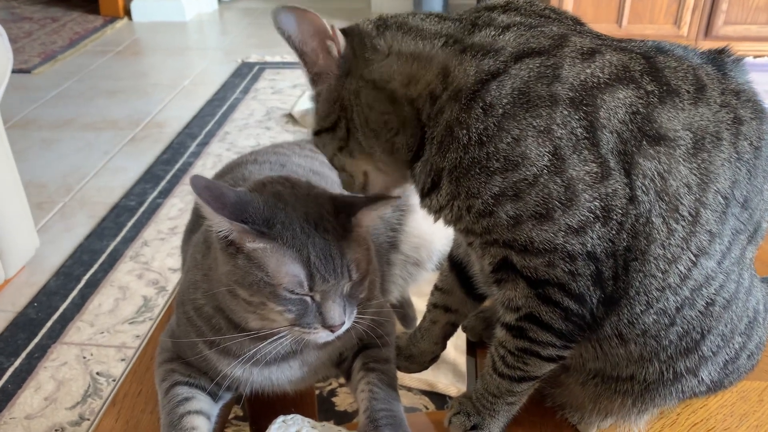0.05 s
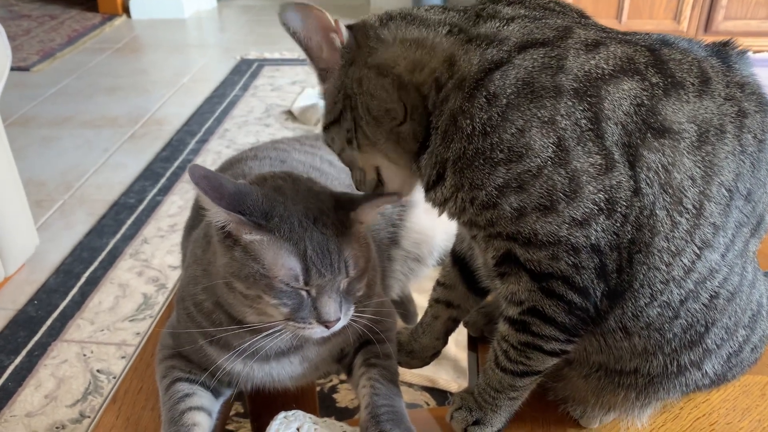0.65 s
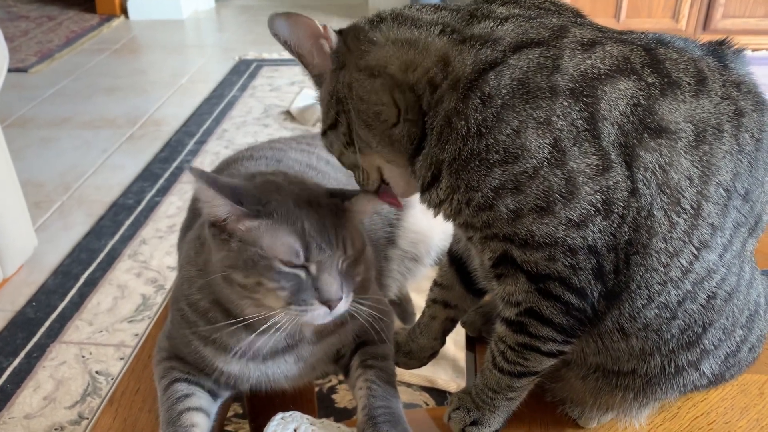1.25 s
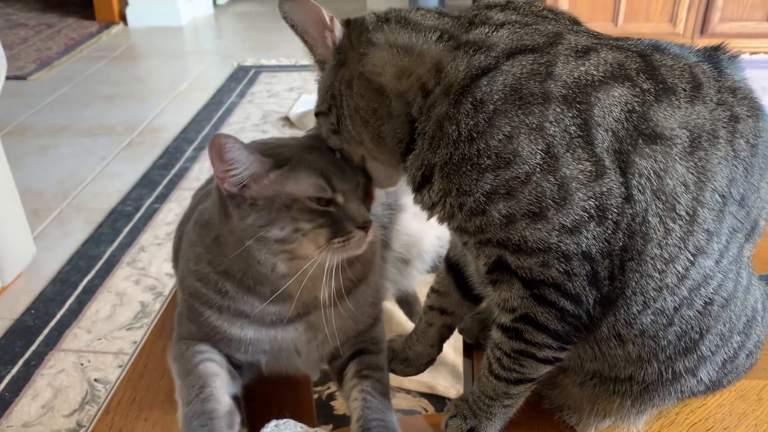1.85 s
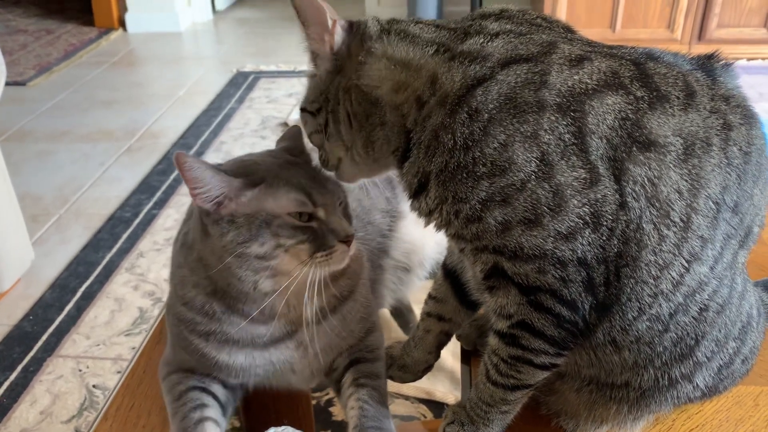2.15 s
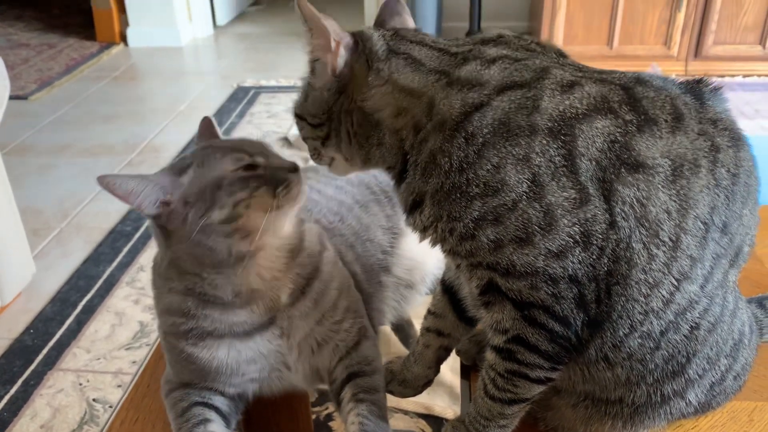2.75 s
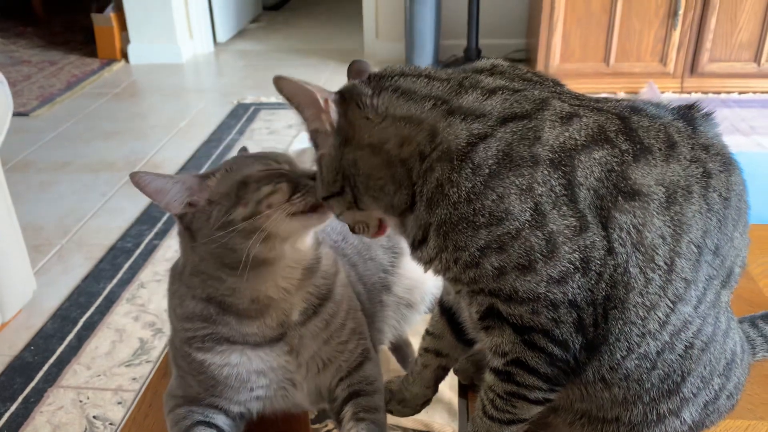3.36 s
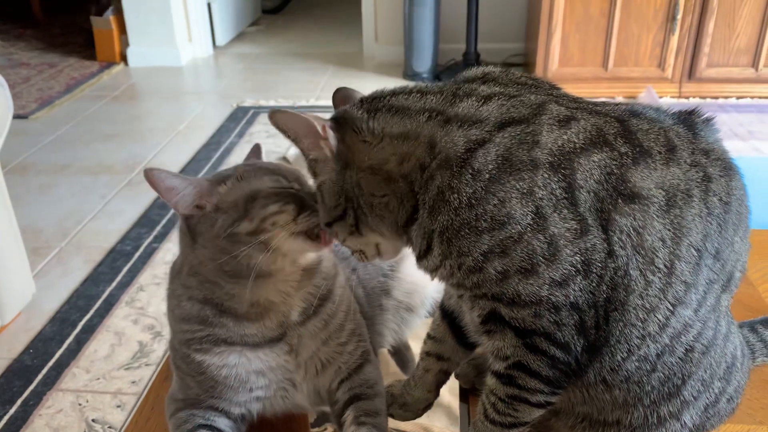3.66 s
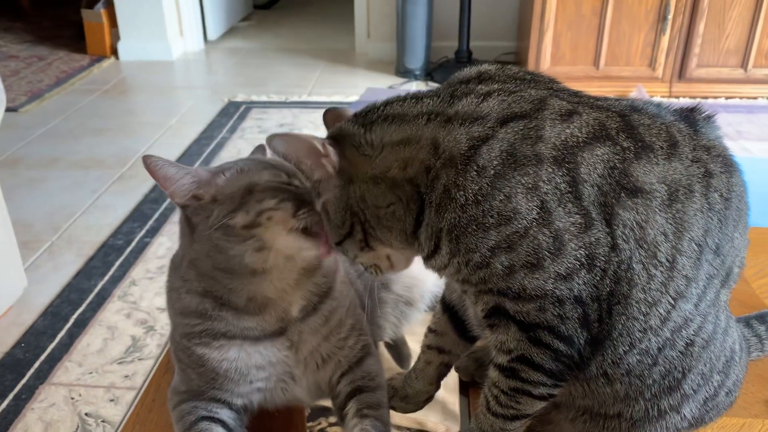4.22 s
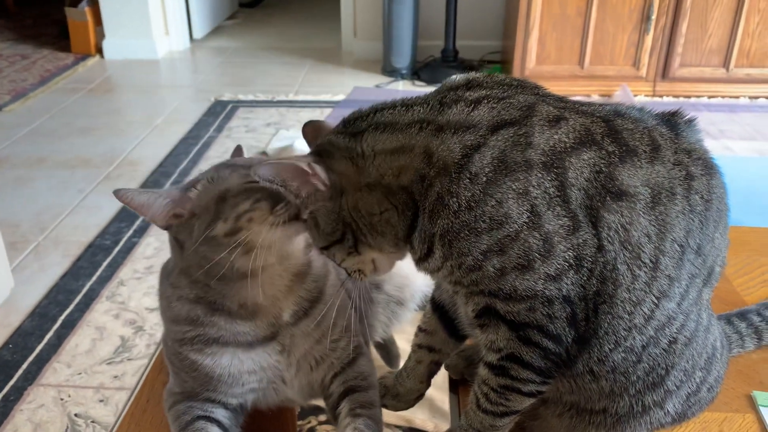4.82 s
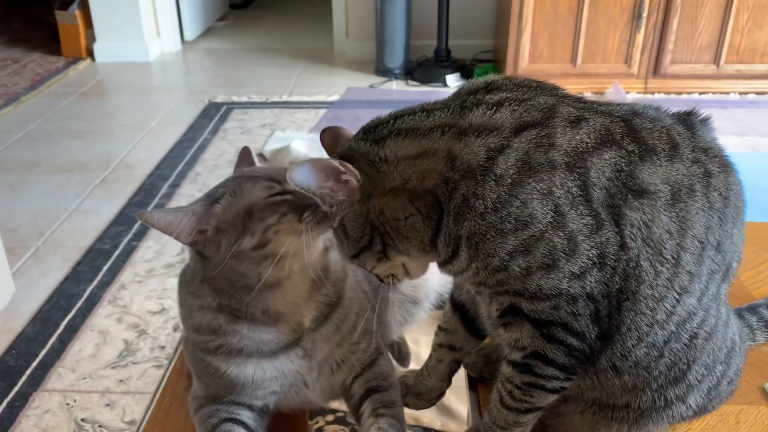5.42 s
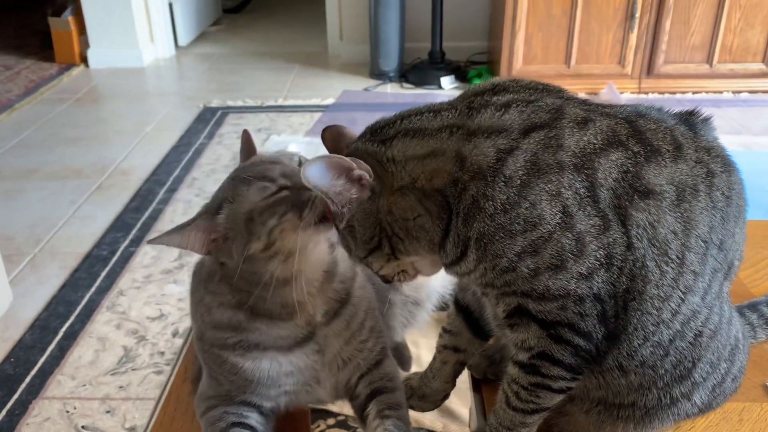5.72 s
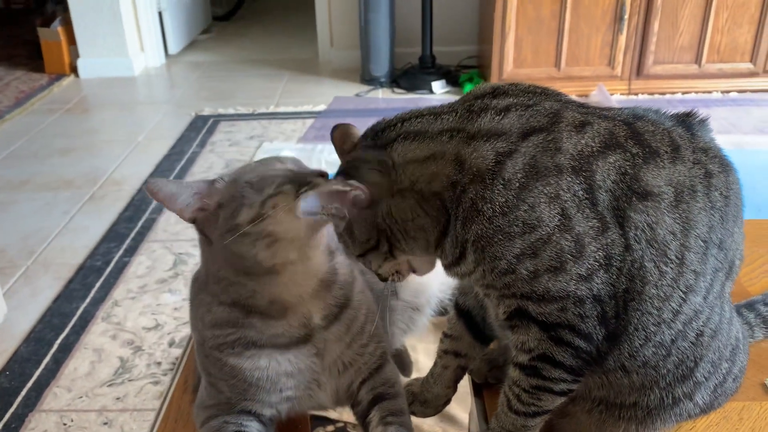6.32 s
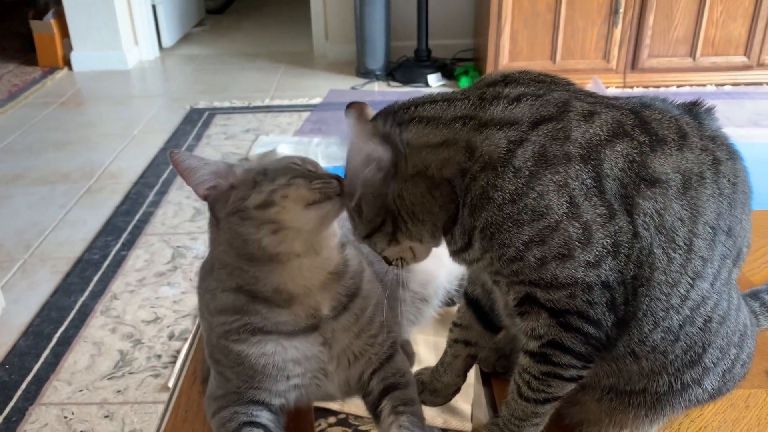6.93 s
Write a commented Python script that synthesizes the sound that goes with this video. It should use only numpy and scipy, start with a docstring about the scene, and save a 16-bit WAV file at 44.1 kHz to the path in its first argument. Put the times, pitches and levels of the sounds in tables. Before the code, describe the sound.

Muffled traffic is heard through the walls of a kitchen throughout, with a low room rumble and faint microphone hiss. A low engine drone is the loudest sound: it rises at about 0.4 seconds, holds until roughly 1.6, then fades away by 3. Tyre noise swells and ebbs, coming up around 3 to 4 seconds, easing off, and returning near 7.

Close by and much quieter, a cat licks another cat. Tiny, high, wet tongue ticks and a faint rasp of fur come in bouts around 1, 3, 4.4 and 6 seconds. The sharpest ticks fall between 3.9 and 4.4 seconds. A saliva bubble pops at 4.4, and a quick cluster follows near 5.5. The lips smack faintly at 1.7 and more clearly at 6.1. Very soft swishes recur a little less than a second apart. Cats and traffic both sit slightly right of centre.

```python
"""A cat grooms another on a kitchen floor: saliva threads tick, bubbles pop, tongue barbs catch hairs,
lips smack; soft swishes recur at an even pace. Floor and cabinets add a short tail.
Traffic outside, louder but dulled by the walls: an engine drones and fades, tyres swell and ebb,
the room booms on its low modes. A close pair of microphone ports adds faint hiss."""
import sys
import numpy as np
from scipy import signal
from scipy.fft import rfft, irfft, next_fast_len
from scipy.io import wavfile
from scipy.ndimage import uniform_filter1d, map_coordinates

SR = 44100
rng = np.random.default_rng(int(sys.argv[2]) if len(sys.argv) > 2 else 0)


def generate_wav(sig):
    """Save sig (samples, or channels by samples) to the path in sys.argv[1] as 16-bit PCM at SR."""
    pcm = np.round(np.clip(np.atleast_2d(sig).T, -1, 1) * 32767).astype(np.int16)
    wavfile.write(sys.argv[1], SR, pcm)


N = 316638

# noise spectra: f/Hz, relative level/dB
ROOM_BOOM_SPECTRUM = [(20, -26.5), (32, -10.5), (50, -4.5), (66, -3), (86, 2.5), (100, -5), (112, -5.5),
                      (140, -9.5), (200, -12), (500, -120)]
VEHICLE_BODY_SPECTRUM = [(20, -58), (90, -29), (140, -2.5), (170, 5), (205, 8.5), (250, 11.5), (290, 8.5),
                         (330, 4.5), (380, -4.5), (600, -40.5), (1500, -120)]
TYRE_ROAR_SPECTRUM = [(20, -46.5), (200, -31.5), (380, -2.5), (470, 3), (580, -3), (830, -3), (1150, -3.5),
                      (1300, -2.5), (1430, -1), (1550, -6), (1750, -13.5), (2100, -28.5), (3200, -47.5),
                      (9000, -120)]
TYRE_FIZZ_SPECTRUM = [(900, -29), (1800, 1.5), (2300, 3.5), (2700, -5), (3100, -16), (4500, -21),
                      (7000, -33), (13000, -94)]
VEHICLE_HISS_SPECTRUM = [(1500, -30.5), (2700, 10), (3300, 3.5), (3900, -0.5), (4500, 10), (5000, 6),
                         (5700, -8), (6900, -2.5), (8000, -23.5), (14000, -71.5)]
MIC_SPECTRUM = [(100, 1.5), (2500, 4), (4200, 5.5), (5300, 0), (7000, 4), (8500, -11.5), (10000, 3.5),
                (11500, 4), (12400, -1), (13300, -10), (15500, -8)]
SWISH_SPECTRUM = [(1200, -20), (2700, 9.5), (4000, -4.5), (7000, -3.5), (9000, -3.5), (11000, 1),
                  (13000, -20), (15500, -12)]
DULL_SWISH_SPECTRUM = [(2000, -24.5), (3400, 4), (4500, -3.5), (5700, 0.5), (7500, -15.5)]
# left-right coherence: f/Hz, coherence
ROOM_COHERENCE = [(30, 1), (90, 0.87), (160, 0.71), (250, 0.89), (500, 0.46), (1400, 0.28), (2300, 0.068),
                  (5000, 0.099)]
MIC_COHERENCE = [(1000, 0.067), (10000, 0.16)]
SWISH_COHERENCE = [(2500, 0.051), (10000, 0.27)]
DULL_SWISH_COHERENCE = [(4000, .4)]
# traffic swells: peak t/s, half length/s, body level/dB, roar level/dB
TRAFFIC_SWELLS = [(0, 0.43, -51, -55), (0.647, 0.39, -60.5, -56), (1.551, 0.85, -57, -59),
                  (3.23, 0.11, -57.5, -62.5), (3.247, 0.57, -56, -55.5), (3.48, 0.044, -66, -58.5),
                  (3.956, 0.43, -58.5, -61.5), (4.292, 0.15, -69, -58.5), (4.898, 0.42, -64.5, -64.5),
                  (6.25, 0.071, -77, -62), (6.46, 0.2, -68, -60.5), (7.036, 0.4, -58, -59.5)]
# constant distant traffic: body level/dB, roar level/dB
TRAFFIC_FLOOR_DB = (-74, -67)
# envelopes of tyre fizz, vehicle hiss, near engine fundamental: t/s, level/dB
FIZZ_ENVELOPE = [(0, -66.5), (.45, -67.5), (.9, -72.5), (1.5, -78), (2.45, -79.5), (2.8, -73),
                 (3.35, -71.5), (3.6, -72), (3.9, -84.5), (4.25, -71.5), (4.6, -84), (5.9, -86.5),
                 (6.35, -81.5), (7.18, -81)]
HISS_ENVELOPE = [(0, -75), (.33, -75.5), (.5, -73), (.7, -75.5), (.98, -84.5), (1.9, -87), (2.5, -95),
                 (3.8, -94.5), (4.25, -85), (4.6, -103)]
DRONE_ENVELOPE = [(0, -47.5), (.25, -49.5), (.41, -33.5), (.5, -33), (.7, -33), (.85, -36), (1.2, -35),
                  (1.3, -39), (1.6, -37.2), (1.8, -44.5), (1.9, -41.5), (2.08, -49), (2.18, -43.5),
                  (2.35, -47), (2.5, -53), (2.85, -53.5), (3.3, -72)]
# near engine overtones: multiple of firing rate, level/dB, peak t/s, half length/s
ENGINE_OVERTONES = [(2, -52.5, 1.06, 0.81), (3, -63.5, 1.03, 0.84), (4, -59, 0.67, 0.15),
                    (5, -55, .72, 0.16)]
# low hums of traffic and room: peak t/s, half length/s, f/Hz, level/dB
TRAFFIC_HUMS = [(0.055, 0.2, 162.7, -56.5), (.05, 0.14, 324.7, -59.5), (0.301, 0.24, 261.5, -58.5),
                (1.599, 0.5, 324, -60), (2.298, 0.14, 250, -58.5), (2.644, 0.39, 95.8, -53.5),
                (3.241, .13, 127, -56.5), (3.247, 0.51, 237.4, -56), (3.21, 0.11, 473.4, -58),
                (3.494, 0.47, 91.5, -57.5), (3.678, 0.25, 469.7, -60), (3.952, 0.46, 268.8, -56.5),
                (4.796, 0.33, 264.7, -62.5), (5.607, 0.37, 92.6, -55), (7.03, 0.32, 204, -57.5),
                (7.057, 0.21, 80.7, -51.5)]
# tyre resonances: peak t/s, half length/s, f/Hz, level/dB
TYRE_PASSES = [(0.045, 0.11, 728, -58), (0.709, .23, 1002, -61), (2.802, 0.38, 678, -64),
               (3.696, .25, 793, -62), (6.604, .33, 897, -62), (6.946, 0.2, 677, -59)]
# steady room tones: f/Hz, width/Hz, level/dB
ROOM_BANDS = [(93.7, 6.3, -61.5), (120.4, 2.7, -64.5), (255, 49, -74), (1388, 130, -67.5)]
# licking bouts: centre t/s, half length/s, base catch rate/Hz
LICK_BOUTS = [(0.899, .9, 14), (3.1, .3, 25), (4.4, .45, 50), (6.0, 0.6, 40)]
# pings of caught hairs: f/Hz, relative spread
HAIR_PINGS = [(6300, .17), (10900, .07)]
# first two swishes: peak t/s, half length/s, level/dB
DULL_SWISHES = [(0.23, 0.018, -74.5), (1.058, 0.025, -78.5)]
# tongue ticks: t/s, level/dB, f/Hz, splash trim/dB
TONGUE_TICKS = [(0.646, -66.5, 14800, 4.5), (1.9318, -70, 10810, 5), (2.942, -67, 7200, 1),
                (3.231, -72, 10600, -6), (3.5523, -65, 10500, 4), (3.9342, -50, 15200, -4.5),
                (4.108, -55.5, 10000, -4.5), (4.2833, -59, 7450, -13), (4.3518, -67.5, 11000, 6),
                (4.3934, -70, 11370, -6), (4.846, -68, 6750, -5), (5.2663, -71, 10400, 3),
                (5.479, -73, 11400, -2), (5.891, -68, 11300, -1), (6.029, -73, 11600, 4),
                (6.254, -66, 7500, -14), (6.451, -70, 11900, -3)]
# lip smacks: t/s, gain/dB, crackle trim/dB
LIP_SMACKS = [(1.719, -73, -2), (6.0225, -72, -6), (6.1246, -59.5, -2)]
# mouth resonances: f/Hz, width/Hz, relative level/dB
MOUTH_MODES = [(2700, 200, -8.5), (3500, 170, 6.5), (4300, 300, -2), (4830, 240, -5.5), (6260, 210, -7.5),
               (6900, 500, -8.5)]
# later swishes: t/s, level/dB, t60/s
SOFT_SWISHES = [(1.873, -77, 0.34), (2.7227, -71, .24), (3.572, -71.5, 0.32), (4.422, -71, .28),
                (5.272, -70.5, 0.3), (6.121, -68.5, 0.22), (6.969, -71, 0.25)]
# saliva bubbles: t/s, level/dB, f/Hz, relative overtone level/dB
BUBBLE_POPS = [(4.4141, -56, 1820, -14), (4.783, -69, 3180, -14), (5.457, -60.5, 1800, -13),
               (5.479, -63, 1870, -14), (5.4863, -61, 1800, -16)]


def amp(db):
    """Decibels to gain."""
    return 10 ** (np.asarray(db) / 20)


def unit(x):
    """Scale to rms 1."""
    return x / np.sqrt(np.mean(x ** 2) + 1e-20)


def log_interp(points, hz):
    """Read (f/Hz, value) points on a log axis."""
    f, values = np.transpose(points)
    return np.interp(np.log(hz + 1), np.log(f + 1), values)


def curve(points):
    """Read (t/s, value) points at every sample."""
    return np.interp(np.arange(N) / SR, *np.transpose(points))


def wobble(rate_hz):
    """Smooth random curve, knots at rate_hz."""
    knots = rng.standard_normal(int(N * rate_hz / SR) + 4)
    return map_coordinates(knots, [np.arange(N) * rate_hz / SR])


def swell(at_s, half_s, order):
    """Bell-shaped envelope; higher order, steeper flanks."""
    return 1 / (1 + np.abs((np.arange(N) / SR - at_s) / half_s) ** order)


def filtered(x, response):
    """Apply a complex frequency response."""
    n = x.shape[-1]
    padded = next_fast_len(n + SR // 4)
    return irfft(rfft(x, padded) * response(np.fft.rfftfreq(padded, 1 / SR)), padded)[..., :n]


def resonance(f, hz, width_hz):
    """Response of one damped mode."""
    return 1j * f * width_hz / (hz * hz - f * f + 1j * f * width_hz)


def bandpass(x, hz, width_hz):
    """Two equal resonances in series; output rms 1."""
    return unit(filtered(x, lambda f: resonance(f, hz, width_hz) ** 2))


def add(track, at_s, sound):
    """Mix a sound into a track."""
    span = track[max(round(at_s * SR), 0):][:len(sound)]
    span += sound[:len(span)]


def ports(x, lag_ms):
    """Stereo arrival: left port lags right."""
    return filtered(x * np.ones((2, 1)),
                    lambda f: np.exp(np.outer([-1, 1], 1j * np.pi * f * lag_ms / 1000)))


def stereo_noise(spectrum, coherence=ROOM_COHERENCE):
    """Coloured, partly coherent noise, rms 1."""
    def mid_side_gains(f):
        angle = np.arccos(np.clip(log_interp(coherence, f), -1, 1)) / 2
        return amp(log_interp(spectrum, f)) * [np.cos(angle), np.sin(angle)]
    mid, side = filtered(rng.standard_normal((2, N)), mid_side_gains)
    return unit(np.array([mid + side, mid - side]))


def narrow_noise(hz, width_hz):
    """Narrowband noise, heard as a wavering tone; rms 1."""
    return unit(filtered(rng.standard_normal(N), lambda f: 1 / (1 + (2 * (f - hz) / width_hz) ** 4)))


def patchy(x, depth_db):
    """Moving sources shift the room's colour: random gain patches, about 80 Hz by 0.25 s."""
    frames = signal.stft(x, nperseg=2048)[2]
    field = uniform_filter1d(rng.standard_normal(frames.shape[1:]), size=4, axis=0)
    field = unit(uniform_filter1d(field, size=11, axis=1))
    return unit(signal.istft(frames * amp(depth_db * field), nperseg=2048)[1][:, :N])


def road(boom_floor_db=-58, boom_follow_db=1):
    """Road noise through walls: swells add in power to distant traffic; the room's boom follows."""
    power = sum(np.outer(amp([body_db, roar_db]) ** 2, swell(at_s, half_s, order=3))
                for at_s, half_s, body_db, roar_db in TRAFFIC_SWELLS)
    body_gain, roar_gain = np.sqrt(power + amp(TRAFFIC_FLOOR_DB)[:, None] ** 2)
    boom_gain = np.hypot(amp(boom_floor_db), amp(boom_follow_db) * body_gain)
    boom = boom_gain * stereo_noise(ROOM_BOOM_SPECTRUM)
    body = body_gain * amp(0.72 * wobble(15)) * stereo_noise(VEHICLE_BODY_SPECTRUM)
    roar = roar_gain * amp(0.98 * wobble(13)) * patchy(stereo_noise(TYRE_ROAR_SPECTRUM), depth_db=2.5)
    fizz = amp(curve(FIZZ_ENVELOPE)) * patchy(stereo_noise(TYRE_FIZZ_SPECTRUM), depth_db=2.2)
    hiss = amp(curve(HISS_ENVELOPE)) * patchy(stereo_noise(VEHICLE_HISS_SPECTRUM), depth_db=2.4)
    return (boom + body) * amp([[-.8], [.8]]) + roar + fizz + hiss


def near_engine(revved_hz=91, idle_hz=73.3, settle_s=.27, pull_at_s=2.3, pull_s=.3, pull_hz=2.6,
                flutter_db=3.0, wander_rad=0.77, waver_db=.5, uneven_db=2.5):
    """Exhaust drops to idle, speeds up slightly, fades; uneven firing roughens the overtones."""
    t = np.arange(N) / SR
    firing_hz = idle_hz + (revved_hz - idle_hz) * np.exp(-(t / settle_s) ** 3)
    firing_hz += pull_hz * (1 + np.tanh((t - pull_at_s) / pull_s)) / 2
    phase = 2 * np.pi * np.cumsum(firing_hz) / SR
    overtones = np.zeros(N)
    for k, db, at_s, half_s in ENGINE_OVERTONES:
        gain = amp(db + flutter_db * wobble(13)) * swell(at_s, half_s, order=4)
        overtones += gain * np.sin(k * phase + k / 2 * wander_rad * wobble(14))
    throb = unit(amp(uneven_db * wobble(idle_hz / 2)))
    drone = amp(curve(DRONE_ENVELOPE) + waver_db * wobble(7.8)) * np.sin(phase)
    return np.sqrt(2) * (drone + throb * overtones)


def traffic_hums(drift_ratio=0.01193, width_ratio=0.1):
    """Low hums of traffic and room swell and fade: each a drifting tone in narrowband noise."""
    track = np.zeros(N)
    for at_s, half_s, hz, db in TRAFFIC_HUMS:
        pitch_hz = hz * (1 + drift_ratio * wobble(12))
        tone = unit(np.sin(2 * np.pi * np.cumsum(pitch_hz) / SR))
        hum = unit(tone + narrow_noise(hz, width_ratio * hz))
        track += amp(db) * swell(at_s, half_s, order=4) * hum
    return track


def tyres(width_ratio=.45):
    """Each set of tyres colours the road noise with its own broad resonance."""
    return sum(amp(db) * swell(at_s, half_s, order=3)
               * bandpass(stereo_noise(TYRE_ROAR_SPECTRUM), hz, width_ratio * hz)
               for at_s, half_s, hz, db in TYRE_PASSES)


def room_tones():
    """Low room modes, mains hum and a faint window ring, throughout."""
    return sum(amp(db) * narrow_noise(hz, width_hz) for hz, width_hz, db in ROOM_BANDS)


def tongue_rasp(level_db=-76.5, clump_db=4, scatter_db=2.2, decay_s=.0004):
    """Tongue barbs catch single hairs: faint pings of random pitch, clumped within each bout."""
    rate_hz = sum(catch_hz * swell(at_s, half_s, order=4) for at_s, half_s, catch_hz in LICK_BOUTS)
    catches = np.flatnonzero(rng.random(N) < rate_hz / SR * amp(clump_db * wobble(6)))
    track, t = np.zeros(N), np.arange(-SR // 400, SR // 400) / SR
    for sample, (band, detune, size) in zip(catches, rng.standard_normal((len(catches), 3))):
        hz, spread = HAIR_PINGS[int(band > 0)]
        ping = np.sin(2 * np.pi * hz * np.exp(spread * detune) * t) * np.exp(-np.abs(t / decay_s))
        add(track, sample / SR, amp(level_db + scatter_db * size) * ping)
    return track


def dull_swishes():
    """First two of the evenly recurring soft swishes: short, lower in colour."""
    gain = sum(amp(db) * swell(at_s, half_s, order=4) for at_s, half_s, db in DULL_SWISHES)
    return gain * stereo_noise(DULL_SWISH_SPECTRUM, DULL_SWISH_COHERENCE)


def tongue_ticks(half_s=0.00055):
    """Saliva threads snap: a millisecond ping of a tiny cavity plus a bright splash."""
    track, t = np.zeros(N), np.arange(-SR // 100, SR // 100) / SR
    envelope = 1 / (1 + np.abs(t / half_s) ** 3)
    for at_s, db, hz, splash_db in TONGUE_TICKS:
        ping = np.sin(2 * np.pi * hz * t + rng.uniform(0, 2 * np.pi))
        splash = bandpass(rng.standard_normal(len(t)), hz=10900, width_hz=5000) / 2
        add(track, at_s + t[0], amp(db) * (ping + amp(splash_db) * splash) * envelope)
    return track


def kitchen_reverb(x, t60_s=0.085, attack_s=0.0025):
    """Hard floor and cabinets return a short diffuse tail."""
    t = np.arange(SR // 3) / SR
    tail = rng.standard_normal((2, len(t))) * amp(-60 * t / t60_s) * (1 - np.exp(-t / attack_s))
    return signal.fftconvolve(x[None], tail / np.linalg.norm(tail[0]), axes=1)[:, :N]


def lip_smacks(snap_rate_hz=2300, attack_s=.0015, t60_s=0.024, crackle_db=-8.5):
    """Lips part: a saliva film tears in a burst of snaps; the mouth rings briefly."""
    def mouth(f):
        return sum((-1) ** k * amp(db) * resonance(f, hz, width_hz)
                   for k, (hz, width_hz, db) in enumerate(MOUTH_MODES))
    track, t = np.zeros(N), np.arange(SR // 8) / SR
    envelope = (1 - np.exp(-t / attack_s)) * amp(-60 * t / t60_s)
    for at_s, gain_db, trim_db in LIP_SMACKS:
        snaps = (rng.random(len(t)) < snap_rate_hz / SR) * rng.standard_normal(len(t)) * envelope
        crackle = amp(crackle_db + trim_db) * bandpass(snaps, hz=6000, width_hz=6000)
        ring = unit(filtered(snaps, mouth))
        add(track, at_s, 2 * amp(gain_db) * envelope.std() * (ring + crackle))
    return track


def swishes(grain_db=3.6, attack_s=.006):
    """Soft, grainy swishes: fast rise, trailing decay."""
    gain, t = np.zeros(N), np.arange(SR // 3) / SR
    rise = 1 - np.exp(-t / attack_s)
    for at_s, db, t60_s in SOFT_SWISHES:
        add(gain, at_s, amp(db - 60 * t / t60_s) * rise)
    return gain * unit(amp(grain_db * wobble(300)) * stereo_noise(SWISH_SPECTRUM, SWISH_COHERENCE))


def bubble_pops(cavity_half_s=0.0015, overtone_ratio=2.12, snap_db=-9, snap_half_s=0.0011):
    """Saliva bubbles burst: a dry snap inside a few cycles of the mouth cavity and its overtone."""
    track, t = np.zeros(N), np.arange(-SR // 100, SR // 100) / SR
    for at_s, db, hz, overtone_db in BUBBLE_POPS:
        phase = 2 * np.pi * hz * t + rng.uniform(0, 2 * np.pi)
        cavity = np.sin(phase) + amp(overtone_db) * np.sin(overtone_ratio * phase)
        cavity /= 1 + (t / cavity_half_s) ** 4
        snap = bandpass(rng.standard_normal(len(t)), hz=2500, width_hz=3800)
        snap /= 1 + (t / snap_half_s) ** 4
        add(track, at_s + t[0], amp(db) * (cavity + amp(snap_db) * snap))
    return track


def scene():
    """Traffic and cats, both right of centre, over microphone hiss."""
    hums = near_engine() + traffic_hums() + room_tones()
    traffic = ports(road() + tyres() + hums * amp([[-.35], [.35]]), lag_ms=.24)
    ticks, smacks, pops = tongue_ticks(), lip_smacks(), bubble_pops()
    cats = ports(ticks + smacks + tongue_rasp() + swishes() + dull_swishes(), lag_ms=.187)
    cats += ports(pops, lag_ms=.07)
    reflections = kitchen_reverb(amp(-18) * (ticks + pops) + amp(-6) * smacks)
    mic_hiss = amp(-84.0) * stereo_noise(MIC_SPECTRUM, MIC_COHERENCE)
    return traffic + cats + reflections + mic_hiss


def record(dry, fade_s=.004, cutoff_hz=15800):
    """Short fade at both ends, brick-wall low-pass."""
    edge_samples = np.minimum(np.arange(N), np.arange(N)[::-1])
    fade = np.minimum(1, edge_samples / (fade_s * SR))
    return filtered(dry * fade, lambda f: f < cutoff_hz)


dry = scene()
out = record(dry)
generate_wav(out)
```